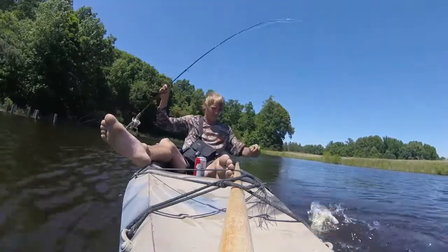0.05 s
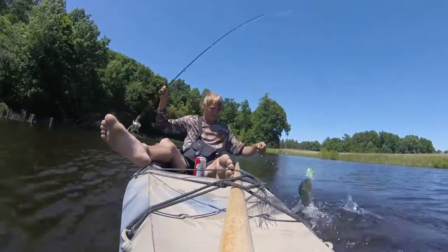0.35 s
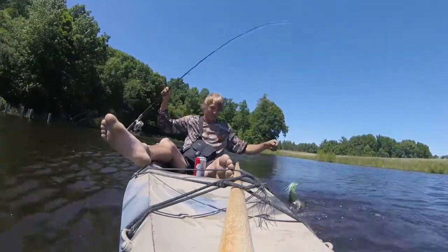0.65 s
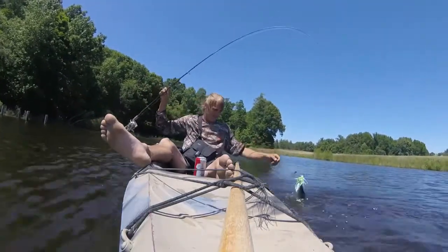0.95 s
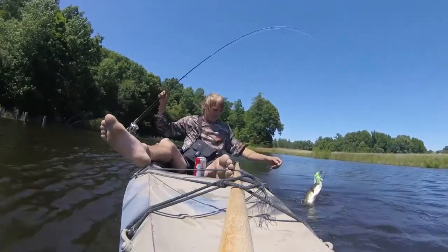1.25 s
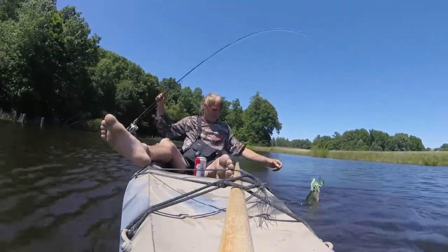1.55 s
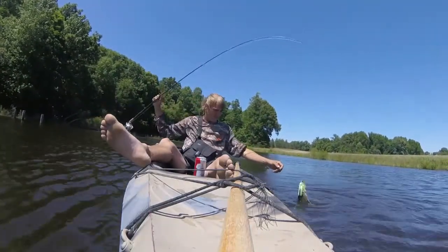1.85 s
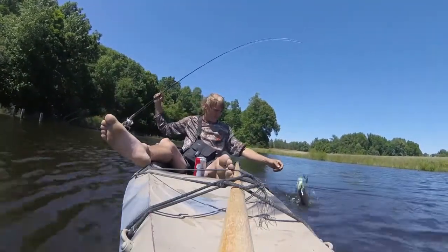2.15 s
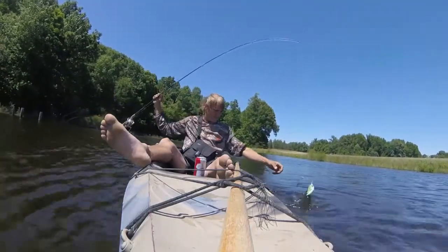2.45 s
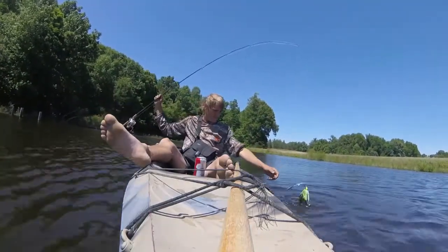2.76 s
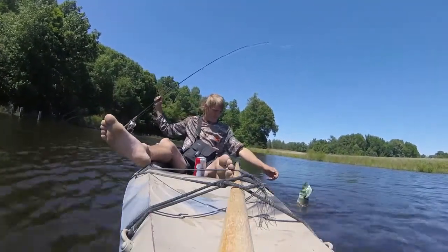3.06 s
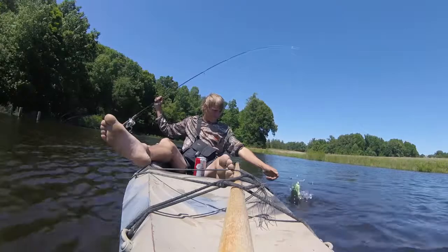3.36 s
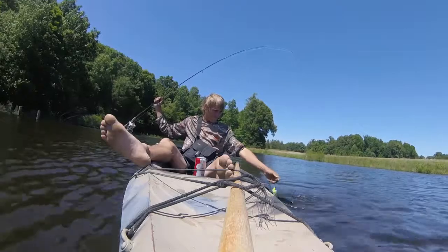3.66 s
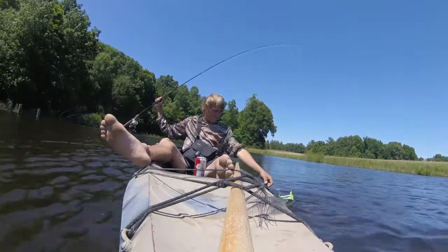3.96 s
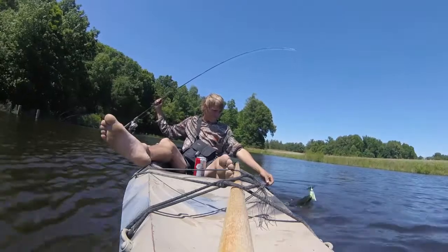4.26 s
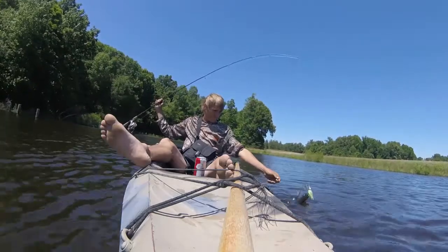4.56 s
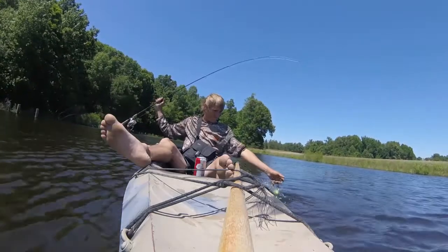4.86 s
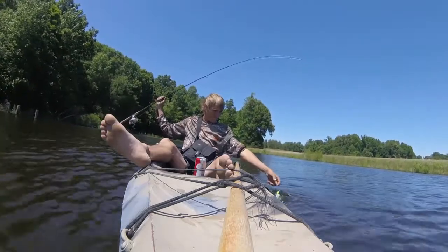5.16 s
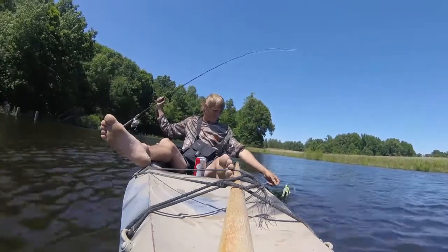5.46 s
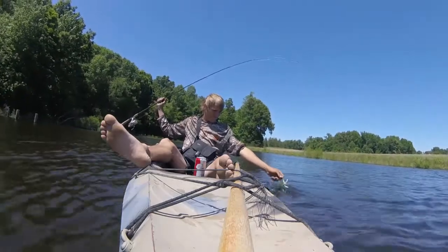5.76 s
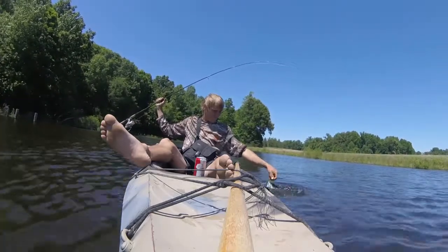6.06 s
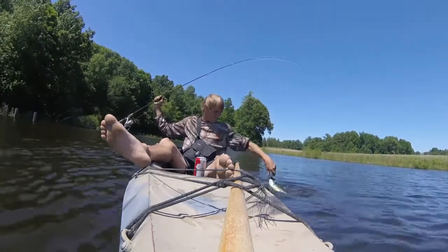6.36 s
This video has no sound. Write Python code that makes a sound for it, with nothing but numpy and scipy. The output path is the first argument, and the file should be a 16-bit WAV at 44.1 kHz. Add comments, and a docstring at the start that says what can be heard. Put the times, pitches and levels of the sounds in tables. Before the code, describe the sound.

A small hooked fish thrashes on a pond beside a kayak, throwing spray and bubbles while water sloshes dully against the hull and a loose metal fitting tinks. After a lull come weaker flips, with plinks, small gulps and ticking drops, then a few last sharp flicks. Low wind buffets the microphone throughout, over a soft hiss and a faint distant motor.

```python
"""Low wind rumble, a soft hiss and a far-off motor run throughout. In the first second a small hooked fish
thrashes on a pond beside a kayak: each flip throws a cloud of ringing bubbles and spray, water shoves
the hull and a loose metal fitting tinks. After a lull, from two seconds on, the fish flips more weakly
as it is drawn in to the hand; single bubbles plink, air pockets gulp shut and falling drops tick.
Near six seconds the breeze picks up and the fish gives a few last sharp flicks."""
import sys
import numpy as np
from scipy import signal
from scipy.fft import rfft, irfft
from scipy.io import wavfile
from scipy.ndimage import uniform_filter1d

SR = 44100
rng = np.random.default_rng(int(sys.argv[2]) if len(sys.argv) > 2 else 0)


def log_audio(samples):
    """Write samples as a 16-bit WAV file to the path given in sys.argv[1]."""
    # one column per channel
    frames = np.atleast_2d(samples).T
    # limit to full scale, then quantise
    limited = np.clip(frames, -1, 1)
    pcm = np.round(limited * 32767).astype(np.int16)
    wavfile.write(sys.argv[1], SR, pcm)


N = 286650  # 6.5 s

# flips of the fish: t/s, length/s, level/dB before the tone filter, middle bubble f/Hz
FLIPS = [(0.01, 0.092, -43.5, 1730), (0.158, 0.047, -33.5, 2300), (0.198, 0.069, -32, 1354),
         (0.278, 0.07, -35, 1570), (0.317, 0.041, -37.5, 710), (0.356, 0.1, -30, 1880),
         (0.461, 0.14, -40, 2770), (0.541, 0.017, -42, 3440), (0.581, 0.031, -35, 2010),
         (0.613, 0.034, -35, 2460), (0.646, 0.044, -44, 1980), (0.702, 0.12, -44, 1800),
         (2.032, 0.05, -39, 3460), (2.087, 0.15, -47, 1690), (2.355, 0.074, -48, 1910),
         (2.478, 0.023, -43, 2700), (2.512, 0.03, -45.5, 1510), (3.273, 0.095, -44, 1550),
         (3.338, 0.046, -41, 2440), (3.39, 0.046, -45.5, 3070), (3.58, 0.11, -46.5, 3020),
         (3.806, 0.079, -46, 4240), (3.872, 0.071, -42.5, 2010), (4.161, 0.061, -46.5, 1910),
         (4.852, 0.056, -43.5, 2820), (4.941, 0.069, -39.5, 587), (5.011, 0.22, -51, 3000),
         (5.197, 0.038, -41.5, 2180), (5.686, 0.037, -42.5, 1330), (5.75, 0.06, -45.5, 2170),
         (5.872, 0.076, -44.5, 1540), (6.071, 0.062, -42, 1180), (6.232, 0.018, -39, 2960),
         (6.252, 0.0068, -33, 2740), (6.262, 0.011, -32, 2050)]
# t60 is the time a sound takes to fade by 60 dB
RING_T60_S, RING_HZ, RING_SLOPE = 0.043, 990, 0.63  # a bubble of RING_HZ rings this long; higher ones less
PIP_CYCLES, PIP_RISE = 25, .27  # a drop's bubble rings this many cycles and climbs by this share
TICK_T60_S = .012


def undb(db):
    """Turn decibels into a factor to multiply by."""
    return 10 ** (np.asarray(db) / 20)


def level(x, db):
    """Scale a sound to an average (rms) level."""
    return x * undb(db) / np.sqrt(np.mean(x ** 2) + 1e-20)


def clock(length):
    """Sample times for a sound of this many seconds."""
    return np.arange(max(int(length * SR), 8)) / SR


def add(out, start, x):
    """Mix x into out from a start time in seconds."""
    i = max(int(start * SR), 0)
    out[i:i + len(x)] += x[:max(len(out) - i, 0)]


def fade(t, t60):
    """Die away, reaching 60 dB down at t60."""
    return np.exp(-np.log(1000) * t / t60)


def colour(x, points):
    """Tone filter: turn pitches up or down along a curve of f/Hz, gain/dB points."""
    hz, db = np.transpose(points)
    f = np.maximum(np.arange(len(x) // 2 + 1) * SR / len(x), 1)
    return irfft(rfft(x) * undb(np.interp(np.log(f), np.log(hz), db)), len(x))


def resonate(x, hz, width_hz):
    """Let through a band around one pitch."""
    hz = min(hz, SR / 3)
    return signal.lfilter(*signal.iirpeak(hz, hz / min(width_hz, SR / 3), fs=SR), x)


def walk(rate):
    """Random drift, about 1 in size, that takes a new turn rate times a second."""
    turns = rng.standard_normal(8192)
    return level(np.interp(np.arange(N) / SR * rate, np.arange(len(turns)), turns), 0)


def bubble(hz, t60, rise, onset):
    """A bubble swells over about onset cycles and rings; its pitch climbs as it nears the surface."""
    t = clock(t60)
    phase = 2 * np.pi * hz * (t + rise * t ** 2 / (2 * t60))
    return np.sin(phase) * fade(t, t60) * (1 - np.exp(-t * hz / onset))


def tick(hz, width):
    """A short burst of noise around a pitch, with peak 1; width is a share of that pitch."""
    t = clock(.03)
    burst = resonate(rng.standard_normal(len(t)) * fade(t, TICK_T60_S), hz, width * hz)
    burst = signal.lfilter([1, 1], 1, burst)  # soften the top of the treble
    return burst / np.abs(burst).max()


def metal_tones(table, t):
    """Struck metal rings at several pitches, each slightly shifted by the way the blow lands."""
    shifts = 1 + 0.002 * rng.standard_normal(len(table))
    return sum(undb(db) * np.sin(2 * np.pi * hz * shift * t) * fade(t, t60)
               for (hz, db, t60), shift in zip(table, shifts))


def air(hiss_db=-54, housing_db=-68):
    """A soft steady hiss, with a faint high ring of the microphone housing."""
    # tone of the hiss: f/Hz, gain/dB
    hiss_tone = [(60, 6.5), (170, 4), (300, 0), (500, -4.5), (1000, -10), (2000, -13.7), (3000, -20.5),
                 (4000, -25.7), (5700, -26.2), (7300, -18.5), (9300, -21.5), (10300, -28.5), (13000, -25),
                 (14500, -84)]
    hiss = colour(rng.standard_normal(N), hiss_tone)
    housing_ring = resonate(rng.standard_normal(N), hz=6545, width_hz=240)
    return level(hiss, hiss_db) + level(housing_ring, housing_db)


def motor():
    """The low tones of a distant motor waver on their way over the water."""
    # tones of the drone: f/Hz, level/dB
    drone_tones = [(58.5, -50.5), (87, -52), (123.8, -47.5), (144, -50), (173, -60.5), (229, -64.5),
                   (247.6, -63), (371, -72)]
    out = np.zeros(N)
    for hz, db in drone_tones:
        wavering_hz = hz * (1 + .004 * walk(rate=6))
        phase = 2 * np.pi * (np.cumsum(wavering_hz) / SR + rng.random())
        out += level(np.sin(phase) * undb(1.6 * walk(rate=7)), db)
    return out


def wind(gust_s=0.027):
    """Swirls of air buffet the microphone, as strongly as the breeze and its short gusts blow."""
    # tone of the rumble: f/Hz, gain/dB
    rumble_tone = [(15, 3.5), (25, 1), (37, 3), (58, 0), (100, -9), (150, -17), (220, -25.5), (320, -40.5),
                   (600, -92), (2000, -110)]
    # strength of the breeze: t/s, level/dB
    breeze_curve = [(0, -33.5), (.35, -37.5), (1.3, -43.5), (2.0, -43), (2.5, -36.5), (2.8, -44.5),
                    (3.8, -41), (4.15, -46), (4.6, -45), (5.1, -36.5), (5.85, -38.5), (6.15, -30.5),
                    (6.5, -28)]
    # gusts, each lasting about gust_s either side of its peak: t/s, level/dB
    gust_peaks = [(.215, -29.5), (.71, -32), (0.935, -29.5), (1.17, -34.5), (1.493, -26.5), (1.581, -30),
                  (2.56, -31.5), (3.93, -31.5), (5.07, -33.5), (5.213, -31.5), (5.46, -32), (5.656, -29),
                  (5.939, -28.5), (6.129, -23), (6.26, -29)]
    t = np.arange(N) / SR
    swirls = colour(rng.standard_normal(N), rumble_tone)
    swirls = signal.sosfilt(signal.butter(2, 20, "high", fs=SR, output="sos"), swirls)
    swirls /= np.sqrt(uniform_filter1d(swirls ** 2, size=3000))  # even out the loudness
    breeze = undb(np.interp(t, *np.transpose(breeze_curve)) + 1.3 * walk(rate=12))
    gusts = sum(undb(db) * np.exp(-((t - peak) / gust_s) ** 2) for peak, db in gust_peaks)
    return swirls * np.hypot(breeze, gusts)


def tinks(contact_s=0.00006, bloom_s=0.0031, click_db=2, bounces=14):
    """The loose metal fitting is tapped and rattles on; each contact clicks and rings high."""
    # taps: t/s, level/dB, main f/Hz, t60/s, upper tones/dB, lower tones/dB, rattle/s, rattle/dB
    # (the last three levels are relative to the first)
    taps = [(0.068, -42, 6370, 0.022, -22, -30, 0.028, -3), (0.25, -48, 6600, .06, -29, -30, .025, 10),
            (0.3193, -27.5, 6650, 0.065, -22.5, -22, .04, -7.5),
            (0.732, -41, 6590, 0.034, -17, -27, 0.054, 2.5),
            (0.8045, -37.5, 6530, 0.026, -26, -23, .02, -6), (2.044, -45, 6500, 0.045, -20, -30, .03, -16),
            (2.115, -45, 6580, 0.043, -23, -30, 0.017, -5), (2.488, -53.5, 6610, 0.069, -17, -30, 0.031, 2),
            (2.771, -52, 6520, 0.072, -27, -30, .015, -3), (3.818, -54, 6570, 0.091, -15, -30, 0.034, 6),
            (4.148, -33, 6510, 0.098, -9.5, -38, 0.014, -1), (4.18, -42, 6550, 0.14, -35, -38, 0.036, 2.5),
            (4.474, -52.5, 6430, 0.068, -18, -8, .02, -1), (4.782, -37.5, 6530, 0.082, -23, -12, 0.012, -9),
            (4.861, -54.5, 6550, 0.089, -32, -30, 0.045, 11.5),
            (5.016, -46.5, 6526, 0.11, -18, -26, .05, 8), (5.127, -58, 6500, .06, -12, -6, 0.013, 3),
            (5.2413, -39.5, 6560, 0.16, -27, -19, 0.022, -3),
            (5.432, -39.5, 6570, 0.055, -31, -20, 0.0097, -3),
            (5.4795, -29, 6584, 0.17, -18, -22.5, 0.024, -16),
            (6.122, -41, 6510, 0.12, -19.5, -13, 0.071, -0.5), (6.398, -54, 6490, 0.25, -15, -30, .03, 1.5)]
    # the fitting's upper and lower tones: f/Hz, relative level/dB, t60/s
    upper_tones = [(6830, 8, 0.04), (6960, 2, 0.035), (9080, 9, 0.055), (9180, 12.5, 0.047),
                   (9480, -2, 0.03), (12030, -8, 0.065), (12720, -10, 0.06)]
    lower_tones = [(1510, -4, 0.075), (2980, -11, 0.06), (3230, -6, 0.06), (4860, -7, 0.07),
                   (5040, -3.5, 0.07)]
    out, t = np.zeros(N), clock(.5)
    for start, db, hz, t60, upper_db, lower_db, rattle_s, rattle_db in taps:
        ring = np.sin(2 * np.pi * hz * t) * fade(t, t60)
        ring += undb(upper_db) * metal_tones(upper_tones, t) * (1 - np.exp(-t / bloom_s))
        ring += undb(lower_db) * metal_tones(lower_tones, t)
        add(ring, 0, undb(upper_db + click_db) * tick(hz=7200, width=0.38))
        ring *= undb(db) * (1 - np.exp(-t / contact_s))
        add(out, start, ring)
        for delay in (np.arange(bounces) + rng.random(bounces)) / bounces:
            add(out, start + delay * rattle_s, undb(rattle_db) / np.sqrt(bounces) * ring)
    return out


def sloshes(width=0.57):
    """Water pushed aside shoves the hollow hull, which answers with a dull low slosh."""
    # shoves of the water: t/s, length/s, level/dB, f/Hz
    shoves = [(0.0, 0.092, -44.5, 134), (0.15, 0.15, -38, 145), (1.401, 0.089, -48, 183),
              (4.937, 0.29, -49, 203), (6.219, 0.27, -40, 123), (6.232, 0.1, -49.5, 330)]
    out = np.zeros(N)
    for start, length, db, hz in shoves:
        t = clock(length)
        body = resonate(rng.standard_normal(SR), hz, width * hz)
        body = resonate(body, hz, width * hz)[-len(t):]
        add(out, start, level(body * np.sin(np.pi * t / t[-1]), db))
    return out


def hull(x, scatter_db=-8, t60=.028):
    """The hull and the rippled surface scatter a sound and smear it by a few milliseconds."""
    t = clock(t60)
    echoes = rng.standard_normal(len(t)) * fade(t, t60) * (t > .001)
    echoes /= np.sqrt(np.sum(echoes ** 2))
    return x + undb(scatter_db) * signal.fftconvolve(x, echoes)[:N]


def trickle(per_s=70, middle_hz=1350, spread_octaves=0.43, typical_db=-55, settle_s=.11):
    """While the water settles, faint bubbles rise: more after a long flip, louder after a hard one."""
    out = np.zeros(N)
    mean_db = np.mean([row[2] for row in FLIPS])
    for start, length, db, _ in FLIPS:
        delays, chance = rng.random(40), rng.standard_normal((40, 2))
        for delay, (pitch, loud) in zip(delays[:int(per_s * length)], chance):
            hz = np.clip(middle_hz * 2 ** (spread_octaves * pitch), 500, 3000)
            t60 = 1.4 * RING_T60_S * (RING_HZ / hz) ** RING_SLOPE
            gain = undb(typical_db + 0.7 * (db - mean_db) + 4 * min(loud, 2))
            add(out, start + length / 2 + settle_s * delay, gain * bubble(hz, t60, rise=.3, onset=1.3))
    return out


def patter(per_s=110, middle_hz=3300, spread_octaves=0.43, typical_db=-45):
    """Thrown spray falls back as fine, pipping spatters, for a little longer than the flip lasts."""
    out = np.zeros(N)
    mean_db = np.mean([row[2] for row in FLIPS])
    for start, length, db, _ in FLIPS:
        delays, chance = rng.random(40), rng.standard_normal((40, 2))
        for delay, (pitch, loud) in zip(delays[:int(per_s * length)], chance):
            hz = np.clip(middle_hz * 2 ** (spread_octaves * pitch), 1200, 6000)
            spatter = bubble(hz, PIP_CYCLES / hz, PIP_RISE, onset=1.6)
            gain = undb(typical_db + 0.41 * (db - mean_db) + 3 * min(loud, 2))
            add(out, start + 1.3 * length * delay, gain * spatter)
    return out


def drops():
    """A falling drop ticks on the surface and traps a small bubble that pips for a few milliseconds."""
    # heavier drops: t/s, tick level/dB, pip level/dB, f/Hz (levels before the tone filter)
    landings = [(0.022, -36, -54, 4630), (0.071, -29.5, -43, 5040), (0.114, -41, -55, 3240),
                (0.171, -33, -49, 4500), (0.3218, -27.5, -42, 3730), (0.536, -21, -37, 4060),
                (0.569, -27, -38, 2420), (0.613, -27.5, -35.5, 2030), (0.802, -43, -45, 2730),
                (1.143, -46, -63, 4200), (2.044, -31, -40, 3700), (2.049, -38, -48, 3300),
                (2.087, -38, -44, 2670), (2.147, -36, -46, 5230), (2.329, -44, -48, 5300),
                (2.398, -35, -40, 3540), (2.564, -35.5, -39, 4050), (2.655, -43, -53, 2940),
                (2.741, -39, -65, 2640), (2.785, -39, -61, 2970), (3.401, -48, -38, 2860),
                (3.3485, -41, -30.5, 3430), (3.364, -47, -34, 3720), (3.376, -42, -39, 2900),
                (3.415, -37, -24, 4310), (3.488, -36, -54, 4850), (3.53, -36.5, -61, 4800),
                (3.595, -35, -51, 1800), (3.695, -41, -41, 3280), (3.815, -32, -51, 5560),
                (3.929, -52, -42, 3000), (4.016, -28.5, -39, 5640), (4.37, -42, -45, 3150),
                (4.559, -42.5, -48.5, 3400), (4.644, -41.5, -44, 3550), (5.031, -54, -38, 5600),
                (5.091, -37, -40, 2270), (5.217, -39, -34, 2630), (5.264, -39, -42, 3900),
                (5.314, -35, -53, 3670), (5.324, -39, -49, 3560), (5.441, -35, -54, 3440),
                (5.688, -30.5, -46, 7140), (5.761, -43, -44, 3580), (5.778, -43, -46, 2670),
                (5.906, -36, -33, 4760), (5.939, -43, -43, 4640), (6.16, -42, -41, 4600),
                (6.192, -38, -57, 2820), (6.244, -27.5, -35, 3530), (6.42, -42, -48, 3400),
                (6.463, -40, -40.5, 2620)]
    out = np.zeros(N)
    for start, tick_db, pip_db, hz in landings:
        pip = bubble(hz, PIP_CYCLES / hz, PIP_RISE, onset=2)
        add(out, start, undb(tick_db) * tick(hz, width=0.7))
        add(out, start, undb(pip_db) * pip / np.abs(pip).max())
    return colour(out, [(300, 0), (8000, -5), (11000, -9.5), (14000, -18)])


def plinks(snap_db=-9):
    """Larger bubbles pinch off with a wet snap, ring and flick upward, the low ones longest."""
    # single bubbles: t/s, f/Hz, level/dB before the tone filter, rise as a share of the pitch
    big_bubbles = [(0.026, 940, -44, 0.43), (0.053, 1740, -38.5, .2), (0.1135, 1600, -38, .27),
                   (0.173, 1320, -34, 0.17), (0.205, 3280, -28.5, 0.19), (0.219, 517, -36, .3),
                   (0.23, 1320, -33, 0.26), (0.236, 2060, -34, .2), (0.36, 2670, -32, 0.3),
                   (0.3838, 638, -23.5, 0.14), (0.388, 1510, -26, 0.5), (0.427, 1620, -31.5, .2),
                   (0.463, 1164, -36, 0.24), (0.621, 1174, -29, 0.14), (0.706, 2750, -45, .2),
                   (0.719, 1850, -41, 0.18), (0.741, 1940, -40.5, 0.24), (0.865, 2450, -41, 0.14),
                   (1.102, 1704, -38.5, 0.88), (1.151, 5300, -44, 0.26), (1.289, 4550, -49.5, .15),
                   (2.046, 3450, -44, 0.18), (2.06, 2400, -39, 0.18), (2.179, 1220, -34.5, 0.26),
                   (2.222, 1460, -49, .3), (2.369, 1895, -33, 0.14), (2.371, 970, -42.5, 0.33),
                   (2.406, 1750, -47, 0.67), (2.525, 1180, -40.5, 0.33), (2.784, 2125, -40, 0.27),
                   (3.3485, 1080, -35, 0.36), (3.35, 2480, -40.5, .2), (3.907, 1520, -41.5, 0.39),
                   (3.984, 1190, -44, .25), (4.144, 1900, -38.5, 0.7), (4.274, 1200, -42, 0.37),
                   (4.871, 1355, -37.5, 0.69), (5.295, 1015, -39, 0.1), (5.328, 1570, -40, 0.97),
                   (5.883, 1800, -38.5, 0.34), (5.915, 433, -35.5, 0.11), (6.091, 540, -38.5, 0.24),
                   (6.193, 1830, -43, 0.48), (6.23, 977, -30.5, 0.38)]
    out = np.zeros(N)
    for start, hz, db, rise in big_bubbles:
        t60 = RING_T60_S * (RING_HZ / hz) ** RING_SLOPE
        add(out, start, undb(db) * bubble(hz, t60, rise, onset=0.31))
        add(out, start, undb(db + snap_db) * tick(hz, width=0.55))
    return colour(out, [(5500, 0), (8000, -8), (12000, -18)])


def gulps():
    """An air pocket swells into a sliding tone as the water closes; small ones wobble faster."""
    # air pockets: t/s, length/s, start f/Hz, end f/Hz, level/dB, place of the peak from 0 to 1
    pockets = [(0.319, 0.027, 365, 390, -32, 0.23), (0.511, 0.055, 1063, 1250, -42.5, 0.5),
               (2.562, 0.055, 278, 310, -38, 0.06), (2.588, 0.097, 301, 558, -41.5, 0),
               (2.637, 0.032, 1040, 1400, -49, 0.4), (2.635, 0.036, 527, 730, -48.5, 0.56),
               (5.03, 0.022, 690, 840, -43.5, .5), (5.04, 0.022, 860, 2620, -42, 0.61),
               (5.149, 0.032, 726, 1030, -43.5, 0.43), (5.199, 0.048, 1197, 1750, -47, 0.37),
               (5.456, 0.024, 970, 2200, -45.5, 0), (5.778, 0.02, 1250, 1810, -43.5, 0.16),
               (5.922, 0.0305, 715, 1410, -44, 0.65), (5.953, 0.041, 690, 1510, -47, 0.27),
               (5.985, 0.035, 757, 1210, -49, 0.05), (6.002, 0.057, 950, 724, -49.5, 0.46),
               (6.272, 0.057, 338, 490, -45, 0.52), (6.316, 0.044, 513, 1060, -39, 0.51),
               (6.378, 0.032, 653, 900, -53, 0.5)]
    out, flutter, wobble = np.zeros(N), walk(rate=300), walk(rate=450)
    for start, length, start_hz, end_hz, db, peak in pockets:
        progress = clock(length) / length
        # a higher pocket steps through the random drifts faster
        steps = (start * SR + np.arange(len(progress)) * start_hz / RING_HZ).astype(int) % N
        hz = start_hz + (end_hz - start_hz) * progress ** 1.6  # the slide speeds up
        hz *= 1 + .06 * start_hz / RING_HZ * wobble[steps]
        tone = np.sin(2 * np.pi * np.cumsum(hz) / SR)
        skewed = np.interp(progress, [0, np.clip(peak, .05, .9), 1], [0, .5, 1])
        swell = np.sin(np.pi * skewed) ** 2
        add(out, start, undb(db) * swell * np.exp(.3 * flutter[steps]) * tone)
    return out


def slaps():
    """The fish hits flat and bursts the air under it in a few cycles."""
    # smacks of tail or body: t/s, f/Hz, level/dB before the swell and fade, t60/s
    smacks = [(0.2011, 720, -9, 0.0066), (0.2011, 1420, -7.5, 0.0049), (0.3215, 650, -22, 0.008),
              (2.564, 905, -9.5, 0.0017), (3.277, 750, -30, 0.012), (3.884, 523, -30, 0.015),
              (4.953, 472, -28, 0.013), (4.969, 905, -35, 0.0097), (5.0893, 935, -17, 0.012),
              (6.093, 800, -30, 0.0042), (6.264, 695, -12.5, 0.0033)]
    out = np.zeros(N)
    for start, hz, db, t60 in smacks:
        add(out, start, undb(db) * bubble(hz, t60, rise=0.17, onset=0.93))
    return out


def splashes(bubbles_per_s=2200, spread_octaves=0.846, scatter_db=5, ring_cycles=14):
    """Each flip traps a cloud of short-lived bubbles of all sizes and throws a crackling hiss of spray."""
    # tone of the splashes: f/Hz, gain/dB
    splash_tone = [(150, -5), (350, -3.5), (1500, -14), (4000, -15.5), (6000, -12.5), (6550, -7.5),
                   (7100, -16.5), (8500, -19), (10500, -24.5), (14000, -51)]
    out = np.zeros(N)
    loudest_db = max(row[2] for row in FLIPS)
    crackle = rng.standard_normal(N) * undb(walk(rate=450))
    for start, length, db, middle_hz in FLIPS:
        chance, delays = rng.standard_normal((1200, 3)), rng.random(1200)
        t = clock(2 * length)
        cloud = np.zeros(len(t))
        force_db = db - loudest_db  # a weaker flip makes fewer bubbles and less spray
        count = int(2 * length * bubbles_per_s * undb(0.88 * force_db))
        for delay, (pitch, life, loud) in zip(delays[:count], chance):
            hz = np.clip(middle_hz * 2 ** (spread_octaves * pitch), 250, 8000)
            t60 = ring_cycles * np.exp(.4 * life) / hz  # crowded bubbles quickly damp each other
            # small bubbles ring shorter but harder, so every size carries a like energy
            gain = undb(scatter_db * min(loud, 1)) * np.sqrt(hz / middle_hz)
            add(cloud, 2 * delay * length, gain * bubble(hz, t60, rise=.22, onset=1.1))
        spray = resonate(crackle[int(start * SR):][:len(t)], middle_hz, width_hz=1.86 * middle_hz)
        splash = level(cloud, 0)
        add(splash, 0, level(spray, 0.5 + 0.5 * force_db))
        surge = (1 - np.exp(-t / (0.16 * length))) * np.exp(-(t / length) ** 2.13)
        add(out, start, level(splash * surge, db))
    return colour(out, splash_tone)


def scene():
    """Mix one channel. Open water returns no echo; only the small drips and bubbles are smeared."""
    drips = hull(trickle() + patter() + plinks() + drops())
    water = splashes() + slaps() + sloshes() + drips + gulps()
    return (water + tinks() + wind() + motor() + air())[None]


def record(dry):
    """Cut the top of the treble, above 14300 Hz."""
    return signal.sosfilt(signal.ellip(8, .2, 80, 14300, fs=SR, output="sos"), dry)


dry = scene()
out = record(dry)
log_audio(out)
```